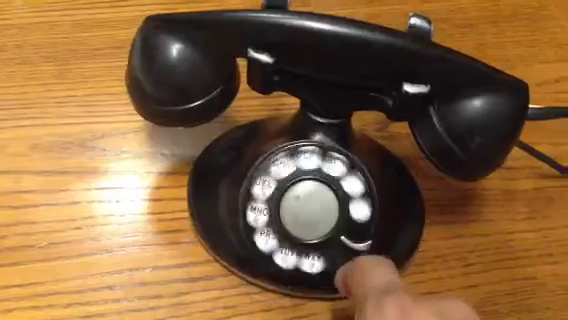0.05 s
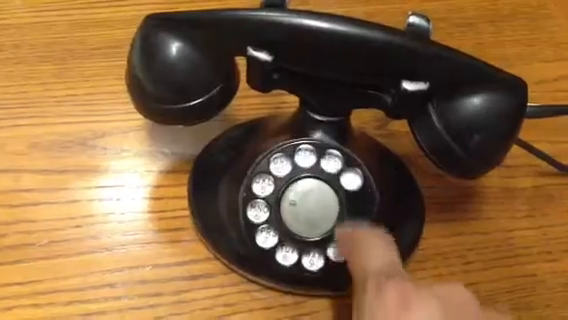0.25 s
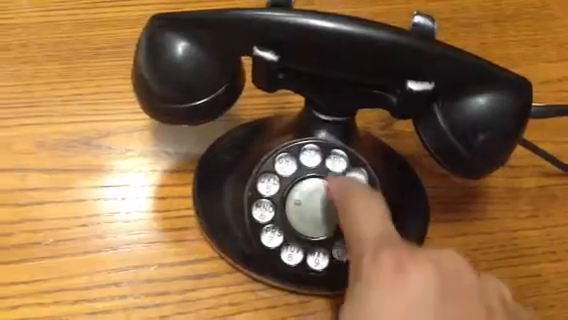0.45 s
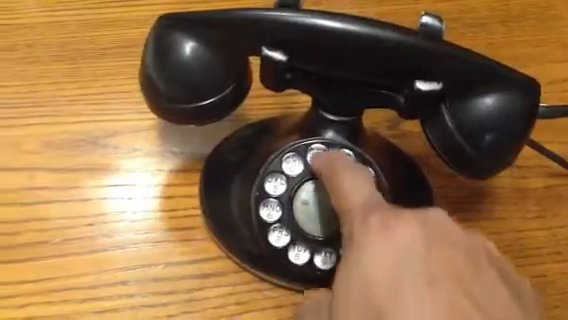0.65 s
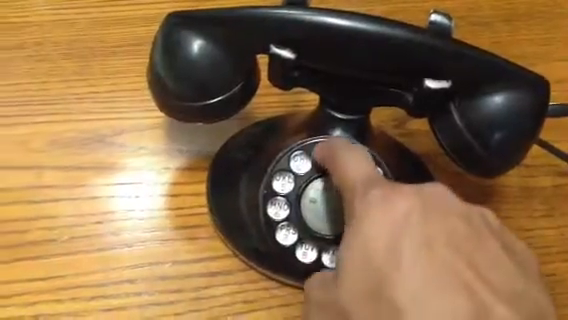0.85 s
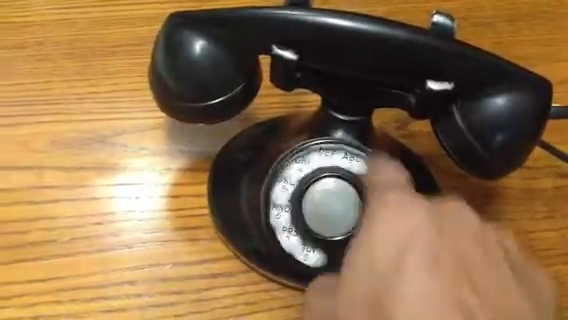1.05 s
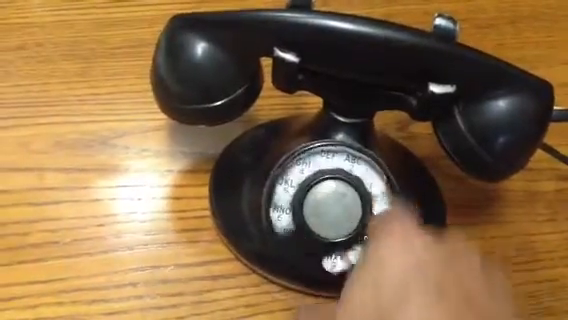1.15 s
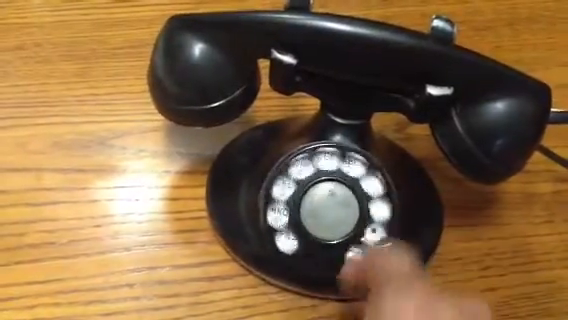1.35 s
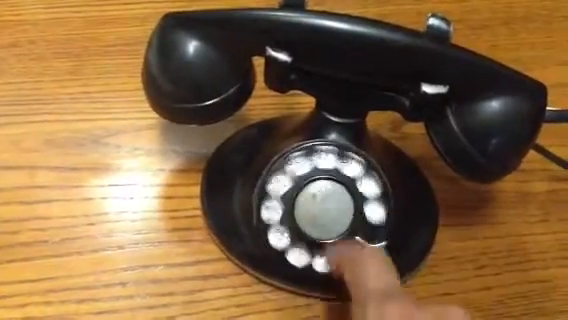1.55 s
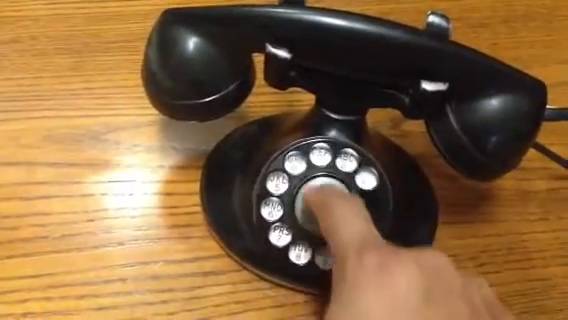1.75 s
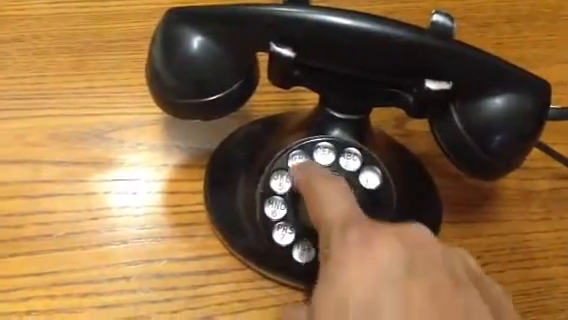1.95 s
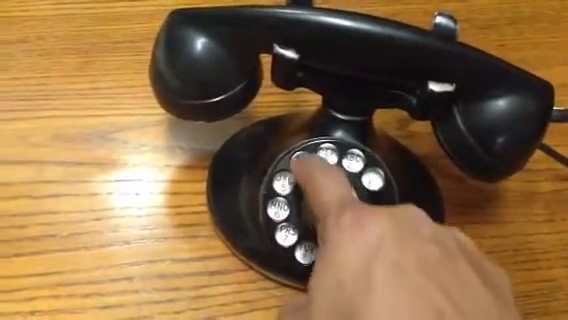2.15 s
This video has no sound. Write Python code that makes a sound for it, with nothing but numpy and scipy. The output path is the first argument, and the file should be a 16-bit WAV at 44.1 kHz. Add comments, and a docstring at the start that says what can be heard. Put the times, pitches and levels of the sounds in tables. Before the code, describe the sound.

A rotary telephone dial whirs back and clacks, is wound up, then whirs back again.

```python
"""An old rotary telephone on a wooden table in a small, quiet room. The dial whirrs home, its governor
rubbing in its cup, and clacks against its rest at 0.23 s; the governor coasts on with a few small ticks.
From 1 s a finger winds the dial up with a rising rasp, knocks the finger stop at 1.2 s and lets go.
The dial whirrs back, ticking, clacks again at 1.74 s and ticks to a halt. The case thuds with the blows.
A faint appliance hum and soft room noise lie underneath throughout."""
import sys
import numpy as np
from scipy import signal
from scipy.fft import rfft, irfft
from scipy.io import wavfile

SR = 44100
rng = np.random.default_rng(int(sys.argv[2]) if len(sys.argv) > 2 else 0)


def output_pcm(signal):
    """Save a mono or channel-first signal as 16-bit PCM at the path in sys.argv[1].

    Samples are clipped to [-1, 1] before scaling.
    """
    pcm = np.clip(np.atleast_2d(signal).T, -1, 1) * 32767
    wavfile.write(sys.argv[1], SR, np.round(pcm).astype(np.int16))


N = 97020

# Wheel hitting its rest. Each row: start in seconds, ring gain in dB, crack gain in dB.
REST_HITS_S_DB = [(.2296, -19, -17.5), (1.7351, -20, -18), (1.7388, -29, -28.5)]
# Knocks at the finger stop. Each row: start in seconds, ring gain in dB, crack gain in dB.
STOP_HITS_S_DB = [(1.1968, -22, -21.5), (1.2068, -47, -25), (1.2436, -42.5, -58)]
# Modes of the dial at its rest. Each row: frequency in Hz, relative level in dB, T60 in seconds.
REST_MODES_HZ_DB_S = [(806, -28.5, 0.075), (1312, -23.5, 0.066), (1700, -8.5, 0.03), (2050, -17.5, 0.04),
                      (2462, -7.5, 0.019), (3222, -8.5, 0.044), (3670, 12, .012), (3876, -7, 0.045),
                      (4440, 6, 0.0092), (4386, -5, 0.042), (5580, 0, .012), (5930, -7.5, 0.034),
                      (6200, -25, 0.01), (7070, 2, 0.022), (7150, -13, 0.027), (10150, -18.5, 0.042)]
# Modes of the finger stop. Each row: frequency in Hz, relative level in dB, T60 in seconds.
STOP_MODES_HZ_DB_S = [(1068, -18.5, 0.077), (1297, -17, 0.079), (1656, -6, 0.023), (2170, -14, 0.03),
                      (3223, 3.5, 0.025), (3500, 10.5, 0.01), (4060, 10.5, 0.013), (4360, 14, 0.0087),
                      (5040, 3.5, 0.015), (5950, 6, .012), (6970, 4.5, 0.011)]
# Spectrum of the crack. Each row: frequency in Hz, relative level in dB.
CRACK_HZ_DB = [(60, -52), (150, -21), (400, -21), (800, -19), (1000, -20), (1500, 3.5), (2800, 0),
               (4200, -1), (7000, 3.5), (9500, -7.5), (12000, -11), (16000, -20)]
# Spectrum of loose parts rattling. Each row: frequency in Hz, relative level in dB.
RATTLE_HZ_DB = [(100, -35), (300, -3.5), (600, -3), (1000, -10), (1500, -3.5), (2100, -8.5), (2600, 1.5),
                (3000, -2), (4200, 5), (5200, -5), (7000, -2.5), (8200, -13.5), (12000, -17), (16000, -26)]
# Thuds of the case on the table. Each row: start in seconds, gain in dB.
THUDS_S_DB = [(0.234, -54), (1.1990, -37), (1.2120, -31), (1.738, -47)]
# Modes of the case. Each row: frequency in Hz, relative level in dB, T60 in seconds.
CASE_MODES_HZ_DB_S = [(257, -14.5, 0.1), (283, -1.5, .028), (452, -1.5, 0.034), (566, -4.5, 0.029)]
# Wind-up envelope. Each row: time in seconds, relative rasp level in dB, relative scrape level in dB.
WINDING_S_DB = [(0.98, -80, -81), (0.992, -66, -102), (1.006, -53, -64.5), (1.054, -45, -56.5),
                (1.13, -43.5, -56.5), (1.14, -44, -53), (1.16, -36.5, -47.5), (1.187, -37, -52)]
# Spectrum of the wind-up's bright rasp. Each row: frequency in Hz, relative level in dB.
RASP_HZ_DB = [(100, -58), (1500, -43), (2700, -33), (3400, 1.5), (3850, -7.5), (4350, 2.5), (4900, -7.5),
              (5800, 3), (6600, -1), (7300, -1), (8400, -8), (9800, 1), (11200, -9.5), (16000, -21.5)]
# Spectrum of its midrange scrape. Each row: frequency in Hz, relative level in dB.
SCRAPE_HZ_DB = [(40, -53), (110, -32), (300, -4.5), (550, 4.5), (850, -0.5), (1350, 8), (2000, 3.5),
                (2700, -3), (6000, -35)]
# Free returns of the wheel. Each row: start and end in seconds, whirr and rumble levels in dB,
# whirr tilt in dB per octave.
RETURNS_S_DB = [(-.1, 0.233, -56, -64.5, 0.5), (1.292, 1.755, -57, -64.5, 0.84)]
# Spectrum of the governor's friction. Each row: frequency in Hz, relative level in dB.
WHIRR_HZ_DB = [(60, -39), (300, -29), (700, -9.5), (1100, -11), (1850, -6), (2300, -13), (2950, -18.5),
               (3600, -4), (3900, -8), (4300, 1), (4800, -8.5), (5350, -13), (6200, -1.5), (6750, -6.5),
               (7200, -8.5), (8700, -17), (10000, -14.5), (12000, -18.5), (16000, -29)]
# Spectrum of the gear rumble. Each row: frequency in Hz, relative level in dB.
RUMBLE_HZ_DB = [(40, -62), (110, -13.5), (200, -16.5), (300, 3), (450, 0), (700, -12), (1500, -56),
                (4000, -78)]
# Ticks of the gear train. Each row: start in seconds, gain in dB.
TICKS_S_DB = [(.186, -57), (.3222, -48.5), (.3310, -50.5), (0.3386, -51), (.3465, -46.5), (0.3535, -51.5),
              (0.36, -56), (1.272, -55.5), (1.338, -46.5), (1.398, -52.5), (1.450, -46.5), (1.565, -48),
              (1.779, -54), (1.794, -49.5), (1.801, -55), (1.8080, -44.5), (1.8165, -56), (1.8225, -53.5),
              (1.8295, -56.5)]
# Modes of the gear train. Each row: frequency in Hz, relative level in dB, T60 in seconds.
GEAR_MODES_HZ_DB_S = [(3730, -9.5, 0.023), (4255, -3, 0.036), (5740, -21, 0.0097)]
# Spectrum of the room's echoes. Each row: frequency in Hz, relative level in dB.
ECHO_HZ_DB = [(100, 20), (700, 13), (1500, 4), (2700, 6), (4500, -13), (8000, -6.5), (16000, -4.5)]
# Tones of the appliance. Each row: frequency in Hz, rms level in dB ahead of the low cut.
HUM_HZ_DB = [(70, -67.5), (120, -81), (206, -71), (292.5, -71), (490, -76.5), (527.5, -77.5), (1447, -83)]
# Spectrum of the room noise. Each row: frequency in Hz, relative level in dB.
AIR_HZ_DB = [(30, 3.5), (60, -26), (100, -10), (125, -11), (177, -5.5), (263, -1.5), (310, -8),
             (379, -11.5), (505, -16), (600, -16), (874, -20), (2070, -18.5), (3000, -22), (15500, -26.5)]


def clacks(hits, modes, crack_lag_s=0.00046, rattle_db=-17.5):
    """Metal meets metal: ringing modes, a short crack, and loose parts that rattle on."""
    body = ring(modes, rise_s=0.0016)
    crack_env = at(crack_lag_s, rise(0.0011) * decay(t60_s=0.022))
    rattle_env = undb(rattle_db) * rise(0.0026) * decay(t60_s=0.16)
    out = 0
    for start_s, ring_db, crack_db in hits:
        crack = crack_env * noise(CRACK_HZ_DB)
        rattle = rattle_env * friction(RATTLE_HZ_DB)
        out += at(start_s, undb(ring_db) * body + undb(crack_db) * (crack + rattle))
    return out


def case_thuds():
    """The heavy case answers the harder blows."""
    body = ring(CASE_MODES_HZ_DB_S, rise_s=0.0038)
    return sum(at(start_s, undb(db) * body) for start_s, db in THUDS_S_DB)


def wind_up(stop_s=1.199, release_s=0.015, rasp_trim_db=-1.5, scrape_trim_db=-2):
    """The mechanism rasps harder as the finger pulls the wheel round, until it meets the stop."""
    t = clock()
    times_s, rasp_db, scrape_db = np.array(WINDING_S_DB).T
    moving = (t > times_s[0]) * np.exp(-np.maximum(t - stop_s, 0) / release_s)
    rasp = friction(RASP_HZ_DB) * undb(np.interp(t, times_s, rasp_db) + rasp_trim_db)
    scrape = friction(SCRAPE_HZ_DB) * undb(np.interp(t, times_s, scrape_db) + scrape_trim_db)
    return moving * (rasp + scrape) * undb(drift(rate_hz=300))


def dial_returns(governor_hz=36, swing_db=0.34, flicker_db=2.3, whirr_up_s=0.046, rumble_up_s=0.062):
    """The governor rubs in its cup, swelling once a turn; the gears rumble as they come up to speed."""
    t, halt_s = clock(), 0.014
    turns = np.cumsum(governor_hz * (1 + 0.018 * drift(rate_hz=15))) / SR
    swell = undb(swing_db * np.sin(2 * np.pi * turns) + flicker_db * drift(rate_hz=150))
    out = 0
    for start_s, end_s, whirr_db, rumble_db, tilt_db in RETURNS_S_DB:
        rubbing = friction([(hz, db + tilt_db * np.log2(hz)) for hz, db in WHIRR_HZ_DB])
        whirr = undb(whirr_db) * swell * rubbing * np.clip((t - start_s) / whirr_up_s, 0, 1)
        rumble = undb(rumble_db) * noise(RUMBLE_HZ_DB) * np.clip((t - start_s) / rumble_up_s, 0, 1)
        out += (whirr + rumble) * np.clip((end_s - t) / halt_s + 0.5, 0, 1)
    return out


def gear_ticks(rise_s=0.0006, ring_db=1):
    """Gear teeth catch briefly, mostly as the governor coasts to a halt."""
    body = undb(ring_db) * ring(GEAR_MODES_HZ_DB_S, rise_s)
    burst_env = rise(rise_s) * decay(t60_s=0.039)
    return sum(at(start_s, undb(db) * (body + burst_env * noise(WHIRR_HZ_DB)))
               for start_s, db in TICKS_S_DB)


def room(x, early_db=-7, late_db=-16.5, rise_s=0.011):
    """Quick reflections from the table and a short tail from the walls."""
    early = unit(noise(ECHO_HZ_DB) * rise(rise_s) * decay(t60_s=0.057))
    late = unit(noise(ECHO_HZ_DB) * rise(rise_s) * decay(t60_s=0.62))
    echoes = (undb(early_db) * early + undb(late_db) * late) / np.sqrt(N)
    return signal.fftconvolve(x, echoes)[:N]


def background(air_db=-62, waver_db=0.81, waver_rad=0.2):
    """The wavering hum of an appliance and soft room noise."""
    hum = 0
    for hz, db in HUM_HZ_DB:
        amplitude = np.sqrt(2) * undb(db + waver_db * drift(rate_hz=2.5))
        hum += amplitude * np.sin(2 * np.pi * hz * clock() + waver_rad * drift(rate_hz=6.7))
    return hum + undb(air_db) * noise(AIR_HZ_DB)


def ring(modes, rise_s, lag_exponent=0.59):
    """Struck modes swell briefly, the low ones first, and die away."""
    median_hz = np.median([mode[0] for mode in modes])
    out = 0
    for hz, db, t60_s in modes:
        envelope = rise(rise_s * (hz / median_hz) ** lag_exponent) * decay(t60_s)
        out += undb(db) * envelope * np.sin(2 * np.pi * hz * clock())
    return out


def friction(spectrum, slips_per_s=4600):
    """Dense tiny slips of uneven size, coloured by the parts they shake."""
    slips = (rng.random(N) < slips_per_s / SR) * np.sign(rng.standard_normal(N))
    size_db = np.minimum(rng.exponential(size=N), 5)
    return colour(slips * undb(size_db), spectrum)


def noise(spectrum):
    """Coloured noise at rms 1."""
    return colour(rng.standard_normal(N), spectrum)


def colour(x, spectrum):
    """Filter by a curve of (Hz, dB) points; scale to rms 1."""
    hz, db = np.array(spectrum).T
    bins_hz = np.maximum(np.fft.rfftfreq(N, 1 / SR), 1)
    gain = undb(np.interp(np.log(bins_hz), np.log(hz), db))
    return unit(irfft(rfft(x) * gain, N))


def drift(rate_hz):
    """Random curve with a spread near 1."""
    knots = rng.standard_normal(1000)
    return np.interp(clock() * rate_hz, np.arange(len(knots)), knots)


def rise(rise_s):
    """Smooth onset from 0 to 1."""
    return 1 - np.exp(-np.square(clock() / rise_s))


def decay(t60_s):
    """Exponential decay."""
    return np.exp(-np.log(1000) * clock() / t60_s)


def at(start_s, x):
    """Delay a sound to its start."""
    return np.concatenate([np.zeros(int(start_s * SR)), x])[:N]


def clock():
    """Time in seconds."""
    return np.arange(N) / SR


def undb(db):
    """Decibels to gain."""
    return 10 ** (np.asarray(db) / 20)


def unit(x):
    """Scale to rms 1."""
    return x / np.sqrt(np.mean(x ** 2))


def scene(blow_send_db=-8):
    """The dial in its room; the blows come straight off the case and are drier than the works inside."""
    blows = clacks(REST_HITS_S_DB, REST_MODES_HZ_DB_S) + clacks(STOP_HITS_S_DB, STOP_MODES_HZ_DB_S)
    blows += case_thuds()
    works = gear_ticks() + dial_returns() + wind_up()
    echoes = room(undb(blow_send_db) * blows + works)
    return (blows + works + echoes + background())[None]


def record(dry, low_cut_hz=122.7, high_cut_hz=15400):
    """Cut the deep bass and the top."""
    thin = signal.sosfilt(signal.butter(4, low_cut_hz, "high", fs=SR, output="sos"), dry)
    return signal.sosfilt(signal.ellip(10, 0.2, 70, high_cut_hz, fs=SR, output="sos"), thin)


dry = scene()
out = record(dry)
output_pcm(out)
```